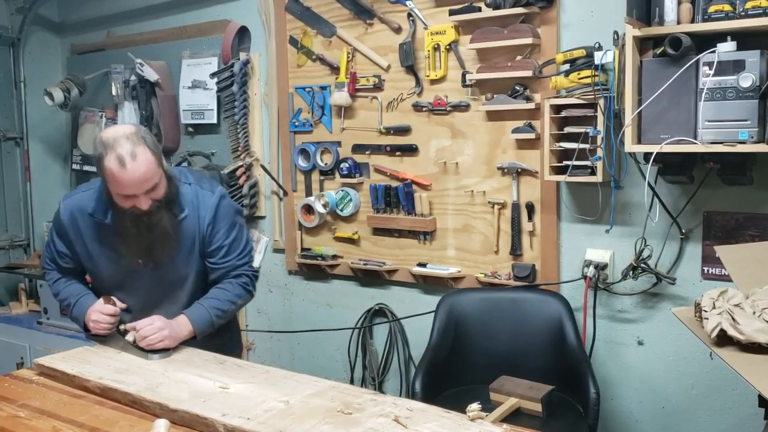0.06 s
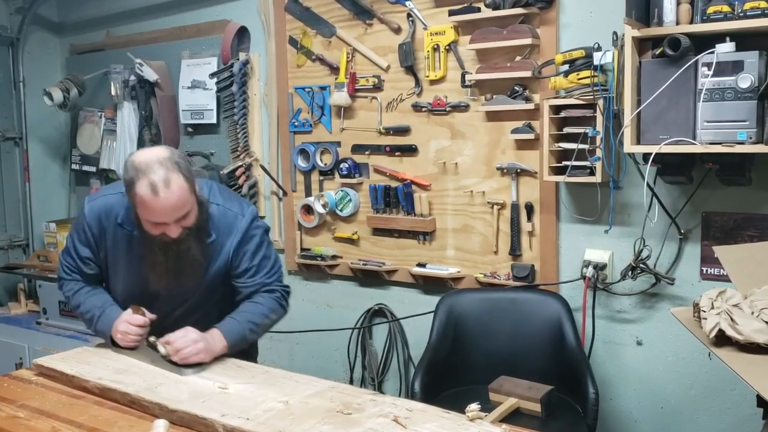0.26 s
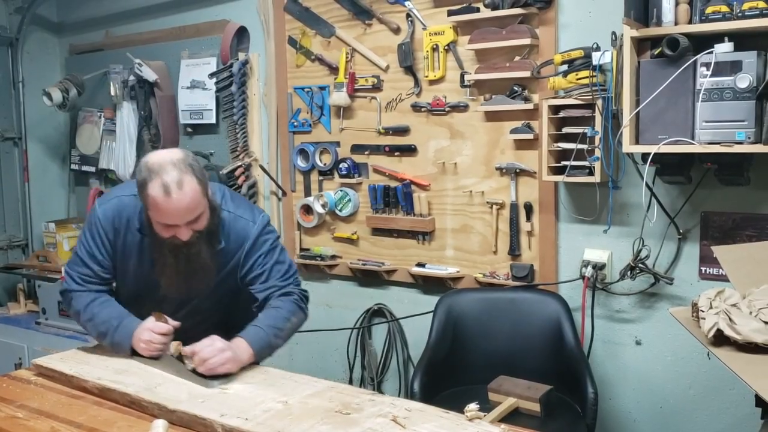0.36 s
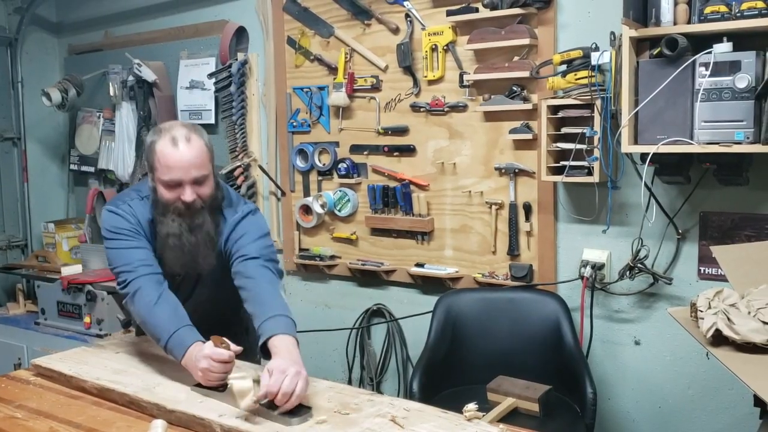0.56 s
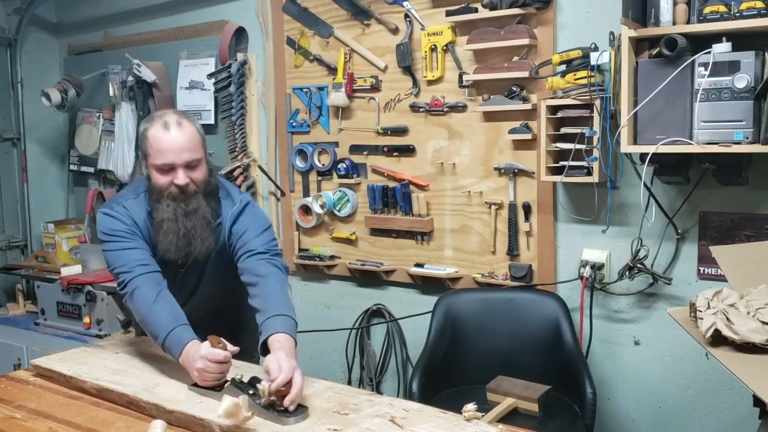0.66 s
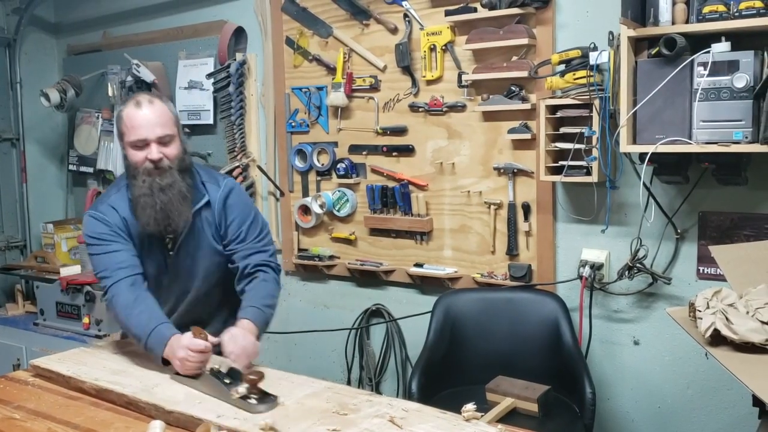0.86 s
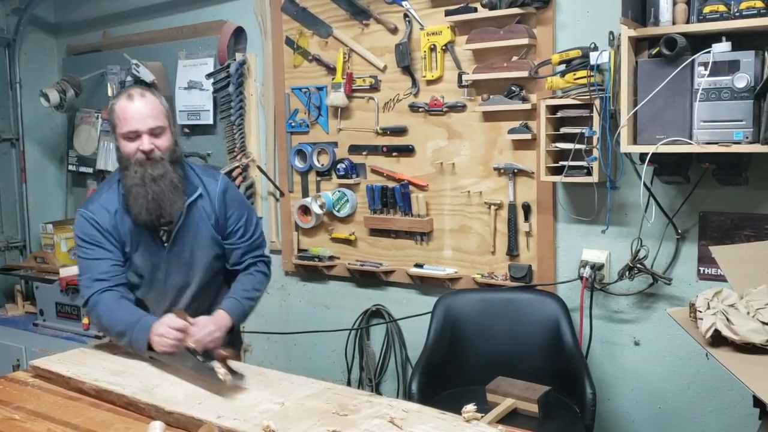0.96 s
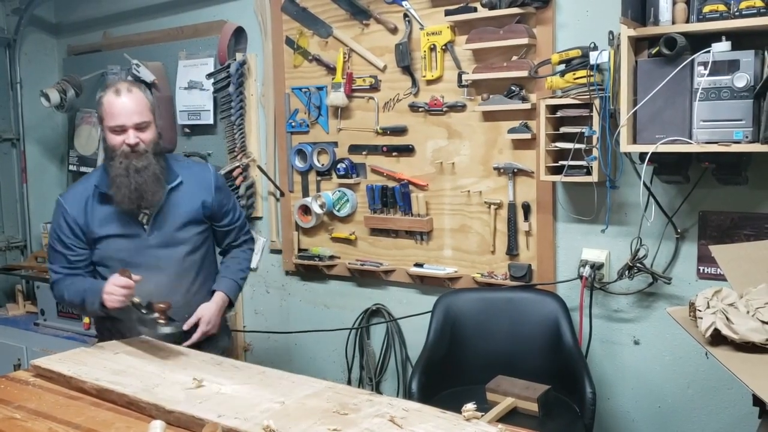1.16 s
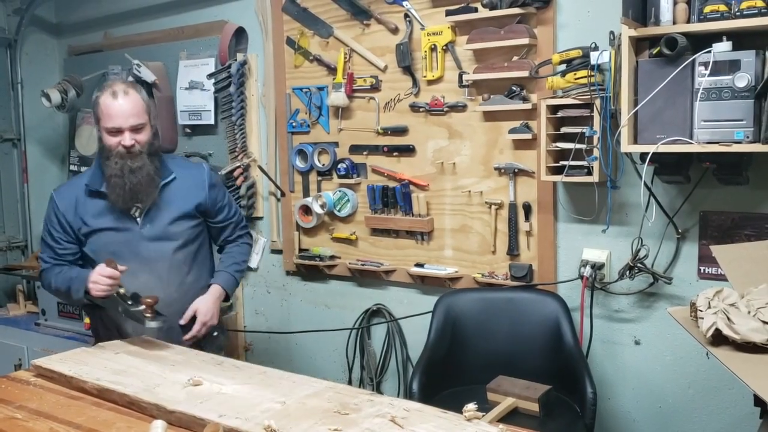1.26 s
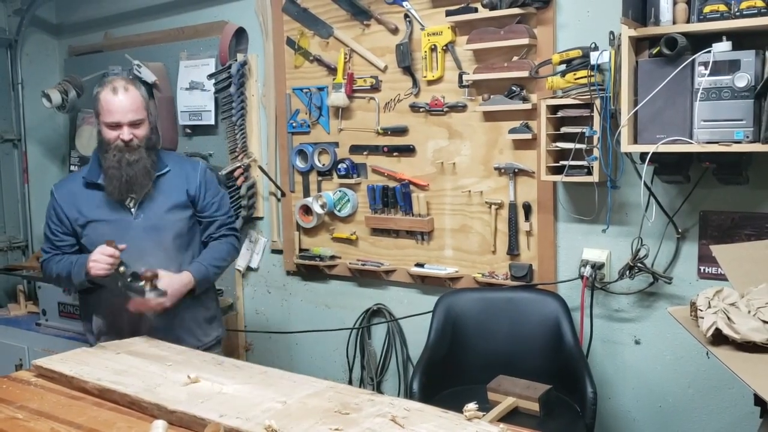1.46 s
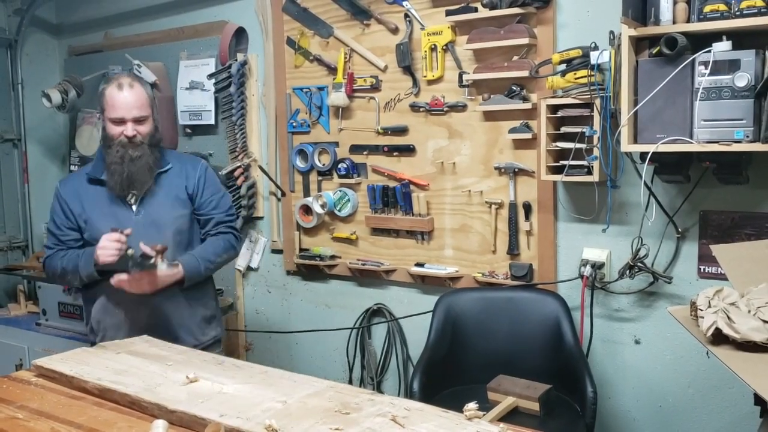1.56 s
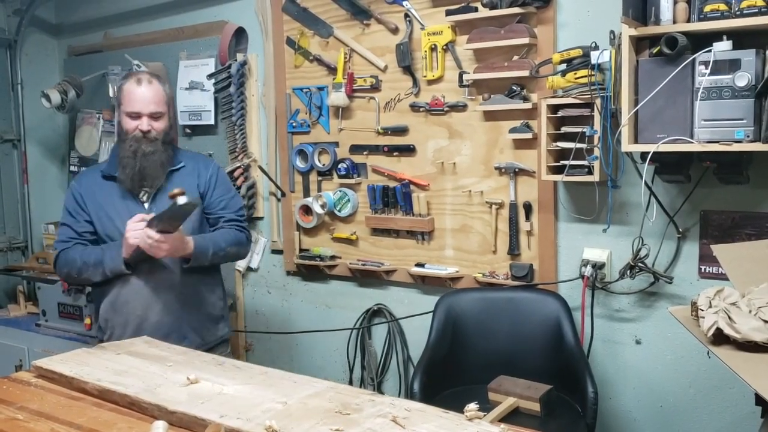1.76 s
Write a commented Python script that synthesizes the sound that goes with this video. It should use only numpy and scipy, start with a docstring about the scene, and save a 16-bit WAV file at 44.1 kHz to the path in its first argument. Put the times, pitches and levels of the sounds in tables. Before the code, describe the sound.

In a small workshop with a low machine hum, a hand plane makes a single quickening, hissing cut through wood. The board knocks several times on the bench, and the plane is drawn back with soft scrapes and rubs.

```python
"""One stroke of a hand plane

A plane takes a quickening stroke along a loose board in a small workshop: the shaving cracks ever
faster, so its rasp rises in pitch. The plane runs off the end, the board clatters and rocks on the
bench, and the sole scuffs the wood as it is drawn back. The plane is lifted and wiped by hand.
A machine hums low in the background."""
import sys
import numpy as np
from scipy import signal
from scipy.fft import rfft, irfft, next_fast_len
from scipy.io import wavfile
from scipy.ndimage import map_coordinates

SR = 44100
rng = np.random.default_rng(int(sys.argv[2]) if len(sys.argv) > 2 else 0)


def wav_out(sig):
    """Save sig, one row per channel (or a flat mono array), as 16-bit PCM at SR to the path in sys.argv[1]."""
    wavfile.write(sys.argv[1], SR, np.round(np.clip(np.atleast_2d(sig).T, -1, 1) * 32767).astype(np.int16))


N = 79380

# Room tone. Each row: frequency in Hz, relative level in dB.
AIR_COLOUR = [(25, -2.5), (60, -13.5), (110, -5.5), (180, -17), (270, -15.5), (400, -26.5), (600, -31),
              (1500, -28.5), (4000, -37), (9000, -40), (13000, -33), (16000, -41.5)]
# The sole riding the board. Each row: time in seconds, rumble gain in dB, groan gain in dB.
SOLE_FADERS = [(0, -34, -44.5), (.04, -38, -33), (.12, -29.5, -38.5), (.165, -40.5, -39.5),
               (.2, -38.5, -28.5), (.235, -39, -39.5), (.27, -42.5, -26.5), (.34, -38, -29.5),
               (.45, -47, -35.5), (.52, -26.5, -31), (.6, -24, -28), (.7, -31, -50), (.8, -39, -55.5),
               (1.0, -39.5, -53), (1.2, -58.5, -72)]
# The sole's low rumble and the wood's hollow groan. Each row: frequency in Hz, relative level in dB.
RUMBLE_COLOUR = [(50, -36), (85, -13.5), (115, 4), (200, 1.5), (350, -1), (520, -17), (950, -19),
                 (1600, -32), (2500, -39), (8000, -62.5)]
GROAN_COLOUR = [(200, -26.5), (400, -12.5), (560, 5), (730, 0.5), (900, -9), (1500, -18.5), (4000, -46.5)]
# The shaving breaking. Each row: time in seconds, cracks per second, chatter gain in dB,
# unevenness of the rate (spread of its natural log).
SHAVING_CRACKS = [(.17, 290, -41, 0.27), (.25, 320.1, -29, .3), (.305, 332.4, -23, 0.27),
                  (.328, 519.7, -45, 0.28), (.345, 781.6, -26, 0.2), (.375, 969, -24, 0.098),
                  (.405, 1012, -19, 0.098), (.434, 1080, -17.5, .15), (.452, 1519, -18, .15),
                  (.47, 1621, -21, .12), (.492, 1400, -46, .17), (.54, 1098, -23, 0.17),
                  (.58, 902, -75, 0.21)]
# The blade's bite. Each row: time in seconds, tearing gain in dB, hiss gain in dB.
BLADE_FADERS = [(.055, -57, -71), (.08, -41, -48.5), (.16, -41.5, -50.5), (.2, -33.5, -43),
                (.24, -29, -35.5), (.3, -26, -34), (.375, -26, -20), (.435, -21.5, -19), (.465, -23.5, -28),
                (.497, -25, -26), (.545, -24.5, -33.5), (.595, -39.5, -47.5), (.635, -55.5, -40.5),
                (.68, -58, -45.5), (.73, -74.5, -52), (.86, -45.5, -53.5), (.97, -82, -56), (1.2, -72, -63)]
# Tearing wood and the shaving's bright hiss. Each row: frequency in Hz, relative level in dB.
TEAR_COLOUR = [(100, -29), (300, -3), (600, -11.5), (1200, 4.5), (1900, 1), (2300, -0.5), (3200, -3),
               (4200, -8), (7500, -14.5), (9000, -25.5), (16000, -21.5)]
HISS_COLOUR = [(1000, -44), (3000, 2.5), (5000, -1), (7500, -0.5), (9000, -6.5), (10500, -1.5),
               (12500, 2.5), (16000, 3)]
# Stick-slip squeaks. Each row: start in seconds, length in seconds, pitch in Hz, gain in dB.
SQUEAK_CUES = [(0.068, 0.046, 3290, -45), (0.339, .04, 3350, -27.5), (0.448, 0.053, 3040, -27.5),
               (0.853, 0.056, 895, -40), (1.011, 0.044, 555, -30), (1.046, 0.051, 1100, -48),
               (1.228, 0.037, 3290, -48), (1.471, 0.065, 1525, -66.5)]
# The board hitting the bench. Each row: start in seconds, gain in dB, low and high edges of the
# excited band in Hz.
KNOCK_CUES = [(.104, -24.5, 92, 180), (.529, -15.5, 149.2, 915), (0.543, -10, 297, 1160),
              (0.566, -8, 280.2, 1041), (0.586, -13, 250, 660), (.631, -18, 198, 604),
              (.72, -37, 169.4, 350), (.843, -16.5, 107, 187), (.866, -25, 129, 507),
              (.884, -12.5, 106, 194), (.929, -17, 163, 393), (.955, -19, 130, 215),
              (1.064, -42, 109.3, 393), (1.229, -42.5, 218, 610)]
# The ring of board and bench. Each row: frequency in Hz, relative level in dB, seconds to fall 60 dB.
BOARD_MODES = [(123.46, 2.5, 0.64), (143.9, -3, 0.5), (161, 3, 0.43), (211.6, -1.5, .25), (257.6, 2, .47),
               (286, -14, 0.52), (329.9, 1, 0.47), (479, -7, 0.43), (546.2, 4, 0.14), (603, -13.5, 0.22),
               (821, -7.5, 0.38), (893, -6.5, 0.27), (1348, 2, 0.1)]
# The thud under each knock. Each row: frequency in Hz, relative level in dB.
THUD_COLOUR = [(60, -40), (90, -28), (130, 5), (250, -4.5), (550, -0.5), (700, -11.5), (900, -2),
               (1400, -18.5), (3000, -3), (8000, -29), (16000, -14.5)]
# Scuffs of sole and hand. Each row: start in seconds, rise in seconds, seconds to fall 60 dB,
# gain in dB, low cut in Hz, high cut in Hz, hiss let past the high cut in dB.
SCUFF_CUES = [(.815, 0.038, 0.29, -41.5, 203, 4040, 6), (1.005, 0.016, 0.26, -48.5, 2870, 15100, -4.5),
              (1.03, 0.037, 0.21, -38.5, 206, 6150, -17.5), (1.151, 0.044, 0.3, -59, 975, 9200, -16),
              (1.221, 0.011, 0.28, -39.5, 1570, 5500, -49.5), (1.28, 0.084, 0.22, -52.5, 800, 6630, -4.5),
              (1.632, 0.044, 0.25, -44, 1903, 3160, -16)]
# The rasp of a scuff before its cuts. Each row: frequency in Hz, relative level in dB.
SCUFF_COLOUR = [(80, -17.5), (300, 6), (550, 2), (700, 1.5), (1100, 1.5), (1400, -4), (1800, -3),
                (2500, -4), (3300, -5.5), (4000, -8), (7500, -8.5), (9000, -15.5), (12500, -5),
                (16000, -13)]
# The workshop's reverb tail. Each row: frequency in Hz, seconds to fall 60 dB.
ROOM_DECAY = [(100, .35), (500, 0.29), (2000, 0.34), (7000, 0.24), (15000, 0.092)]

TIME = np.arange(N) / SR


def amp(db):
    return 10 ** (np.asarray(db) / 20)


def unit(x):
    return x / np.sqrt(np.mean(x ** 2) + 1e-20)


def along(points, hz):
    """Read (Hz, value) points on a log frequency axis."""
    freqs, values = np.transpose(points)
    return np.interp(np.log(hz + 1), np.log(freqs + 1), values)


def curves(rows):
    """An automation curve for each column after the time."""
    times, *columns = np.transpose(rows)
    return [np.interp(TIME, times, column) for column in columns]


def wobble(rate):
    """A smooth random curve, rate knots a second."""
    return map_coordinates(rng.standard_normal(N // 8), [TIME * rate], mode="mirror")


def filtered(x, response):
    """Apply an EQ given as a function of frequency."""
    size = next_fast_len(N + SR // 2)
    return irfft(rfft(x, size) * response(np.fft.rfftfreq(size, 1 / SR)), size)[..., :N]


def low_cut(x, corner_hz):
    return filtered(x, lambda hz: hz ** 2 / np.hypot(hz ** 2, corner_hz ** 2))


def coloured(x, colour):
    """Shape x with a colour table, at rms 1."""
    return unit(filtered(x, lambda hz: amp(along(colour, hz))))


def blend(a, b, share):
    """Mix two sounds by power; share belongs to the first."""
    return np.sqrt(share) * unit(a) + np.sqrt(1 - share) * unit(b)


def scatter(db):
    """A random gain for each sample, within twice db either way."""
    return amp(db * np.clip(rng.standard_normal(N), -2, 2))


def fibres(per_second=8000):
    """Dense tiny snaps of wood fibres, of uneven size."""
    snaps = rng.random(N) < per_second / SR
    return snaps * rng.choice([-1, 1], N) * scatter(db=5.5)


def hum_and_air(hum_hz=75.8, hum_db=-50.5, air_db=-60):
    """The bed: a wavering low machine hum and the still air of the room."""
    turns = np.cumsum(hum_hz + 0.7 * wobble(15)) / SR
    hum = np.sqrt(2) * np.sin(2 * np.pi * turns) * amp(hum_db - 0.9 * wobble(12))
    air = coloured(rng.standard_normal((2, N)) + rng.standard_normal(N), AIR_COLOUR)
    return hum + amp(air_db) * air


def sole_slide():
    """The sole rumbles and groans over the uneven board."""
    rumble_db, groan_db = curves(SOLE_FADERS)
    rumble = amp(rumble_db) * coloured(fibres(), RUMBLE_COLOUR)
    groan = amp(groan_db) * coloured(fibres(), GROAN_COLOUR)
    sliding = TIME < SOLE_FADERS[-1][0]
    return sliding * amp(0.4 * wobble(60)) * (rumble + groan)


def blade_cut(jitter_hz=702.2, flutter_db=1.5, octave_db=-12, crack_share=0.3):
    """The shaving breaks at an uneven rate that climbs, then eases: chatter, tearing wood and hiss."""
    rate_hz, chatter_db, unevenness = curves(SHAVING_CRACKS)
    tear_db, hiss_db = curves(BLADE_FADERS)
    turns = np.cumsum(rate_hz * np.exp(unevenness * wobble(jitter_hz))) / SR
    tone = np.sin(2 * np.pi * turns) + amp(octave_db) * np.sin(4 * np.pi * turns)
    cutting = (TIME > SHAVING_CRACKS[0][0]) & (TIME < SHAVING_CRACKS[-1][0])
    chatter = cutting * unit(tone * amp(flutter_db * wobble(300)))
    chatter = low_cut(amp(chatter_db) * chatter, corner_hz=163)
    clicks = np.diff(np.floor(turns), prepend=0)  # one per cycle of the chatter
    cracks = clicks / np.sqrt(rate_hz) * scatter(db=3.5)  # the same power at any rate
    tear = coloured(blend(cracks * rng.choice([-1, 1], N), fibres(), crack_share), TEAR_COLOUR)
    hiss = coloured(blend(cracks, fibres(), crack_share), HISS_COLOUR)
    on_board = TIME < BLADE_FADERS[-1][0]
    grain = amp(0.99 * wobble(110))
    return chatter + on_board * grain * (amp(tear_db) * tear + amp(hiss_db) * hiss)


def squeaks():
    """The plane sings briefly where wood and metal stick and slip."""
    out = np.zeros(N)
    for start, length_s, hz, db in SQUEAK_CUES:
        swell = np.sin(np.pi * np.clip((TIME - start) / length_s, 0, 1))
        pitch_hz = hz * (1 + 0.013 * wobble(500))
        out += amp(db) * swell * np.sin(2 * np.pi * np.cumsum(pitch_hz) / SR)
    return out


def board_knocks(rise_s=0.0025, thud_t60_s=0.23, low_cut_hz=92):
    """Each knock rings the board's modes over a short thud; the contact decides which band is excited."""
    out = np.zeros(N)
    for start, db, low_hz, high_hz in KNOCK_CUES:
        def contact(hz):
            return (hz / low_hz) ** 2 / np.sqrt((1 + (hz / low_hz) ** 4) * (1 + (hz / high_hz) ** 4))

        t = np.maximum(TIME - start, 0)
        attack = 1 - np.exp(-t / rise_s)
        ring = np.zeros(N)
        for k, (hz, mode_db, t60) in enumerate(BOARD_MODES):
            decay = amp(mode_db + rng.normal(0, 1) - 60 * t / t60)
            ring += (-1) ** k * contact(hz) * decay * np.sin(2 * np.pi * hz * t)
        thud = coloured(rng.standard_normal(N), THUD_COLOUR) * amp(3 - 60 * t / thud_t60_s)
        out += amp(db) * (amp(-6.5) * attack * ring + filtered(attack * thud, contact))
    return signal.sosfilt(signal.butter(4, low_cut_hz, "high", fs=SR, output="sos"), out)


def scuffs():
    """Sole and hand make light, grainy rubs that swell and fade."""
    out = np.zeros(N)
    for start, rise_s, t60, db, thin_hz, dull_hz, hiss_db in SCUFF_CUES:
        def eq(hz):
            return hz / np.hypot(hz, thin_hz) * (1 / np.hypot(1, (hz / dull_hz) ** 3) + amp(hiss_db))

        t = TIME - start
        rasp = coloured(blend(fibres(), rng.standard_normal(N), share=0.2), SCUFF_COLOUR)
        envelope = np.clip(t / rise_s, 0, 1) * amp(db - 60 * np.maximum(t - rise_s, 0) / t60)
        out += envelope * unit(filtered(rasp, eq))
    return out


def room_response(walls_t60_s=0.056):
    """A random slap off the near walls and a short tail, as mid and side."""
    hz, t, spectrum = signal.stft(rng.standard_normal((2, SR // 3)), SR, nperseg=256)
    decay = amp(-60 * t / along(ROOM_DECAY, hz)[:, None])
    tail = signal.istft(spectrum * decay, SR, nperseg=256)[1]
    walls = rng.standard_normal(tail.shape) * amp(-60 * np.arange(tail.shape[1]) / SR / walls_t60_s)
    return amp(-5) * tail / np.linalg.norm(tail[0]) + amp(-0.5) * walls / np.linalg.norm(walls[0])


def workshop(x, wet_db, echo_change_s=0.04, left_lead_s=0.0001):
    """Direct sound reaches the left ear first; ever-changing echoes suggest a moving source."""
    hop = round(echo_change_s * SR)
    padded = np.pad(x, (hop, 2 * hop))
    wet = np.zeros((2, N + 2 * SR))
    crossfade = np.sqrt(signal.get_window("hann", 2 * hop))
    for i in range(0, N + hop, hop):
        piece = padded[i:i + 2 * hop] * crossfade
        echo = signal.fftconvolve(piece[None], room_response(), axes=1)
        wet[:, i:i + echo.shape[1]] += echo
    mid, side = wet[:, hop:hop + N]
    side = low_cut(side, corner_hz=330)  # the echoes narrow to mono in the bass
    direct = filtered(x, lambda hz: np.exp(1j * np.pi * hz * left_lead_s * np.array([[1], [-1]])))
    return direct + amp(wet_db) * np.array([mid + side, mid - side]) / np.sqrt(2)


def scene():
    """The mix: a roomy plane and a drier board over the steady bed."""
    plane = amp(-1.5) * workshop(blade_cut() + scuffs() + squeaks(), wet_db=3)
    board = workshop(board_knocks() + sole_slide(), wet_db=-8.5)
    return plane + board + hum_and_air()


def record(dry, top_hz=15850):
    """Round off the highest peaks and cut the very top of the treble."""
    rounded = dry / (1 + np.abs(dry) ** 6) ** (1 / 6)
    return filtered(rounded, lambda hz: hz < top_hz)


dry = scene()
out = record(dry)
wav_out(out)
```